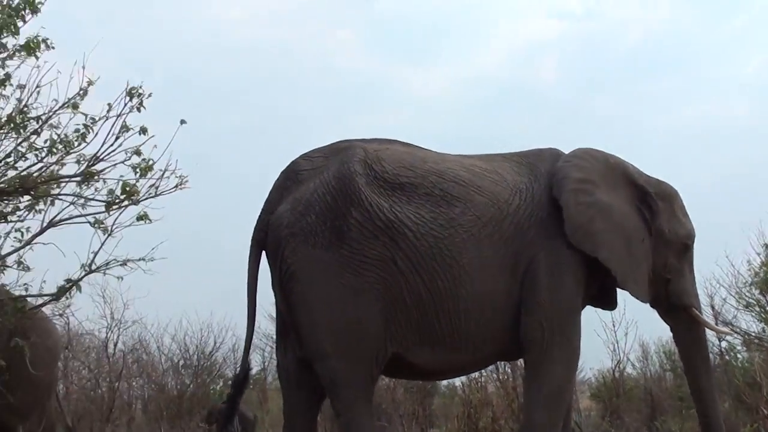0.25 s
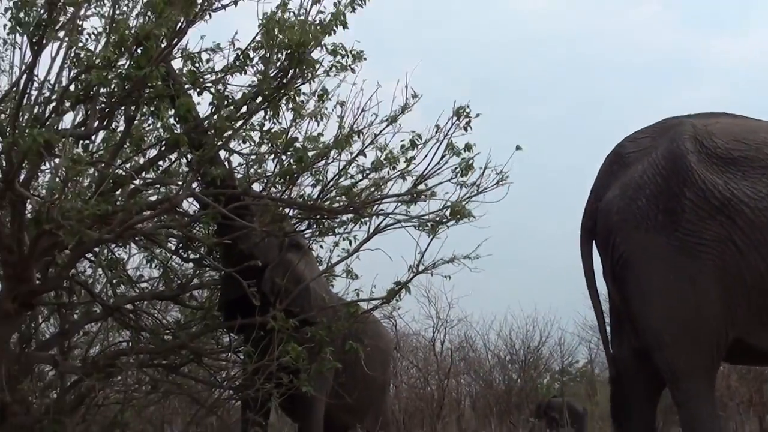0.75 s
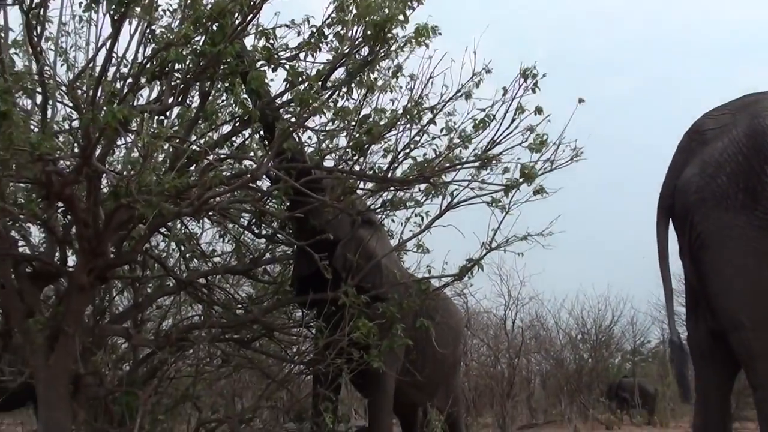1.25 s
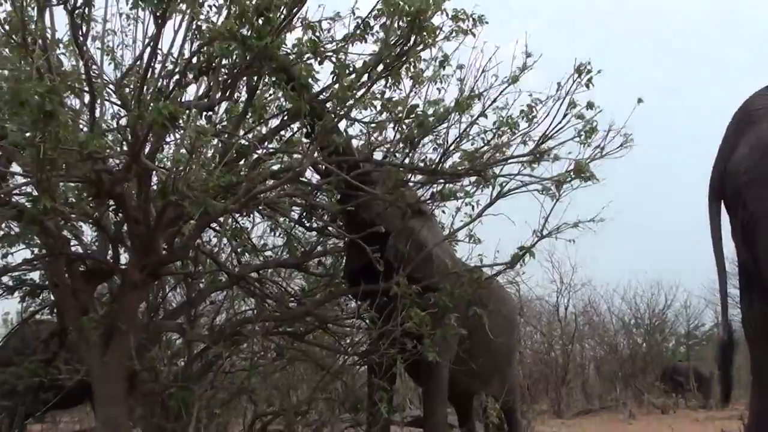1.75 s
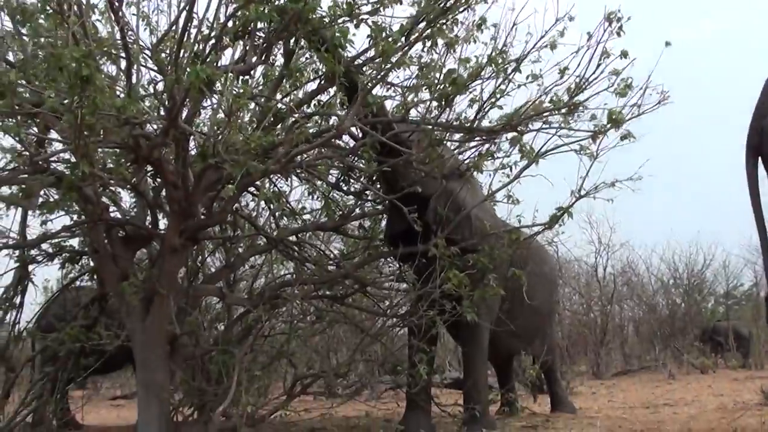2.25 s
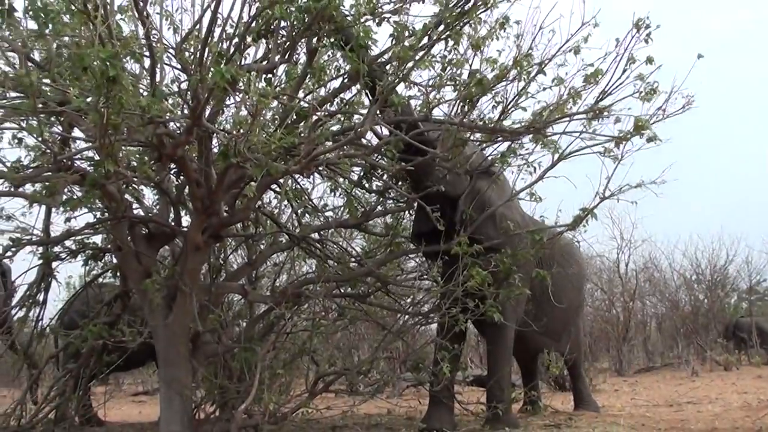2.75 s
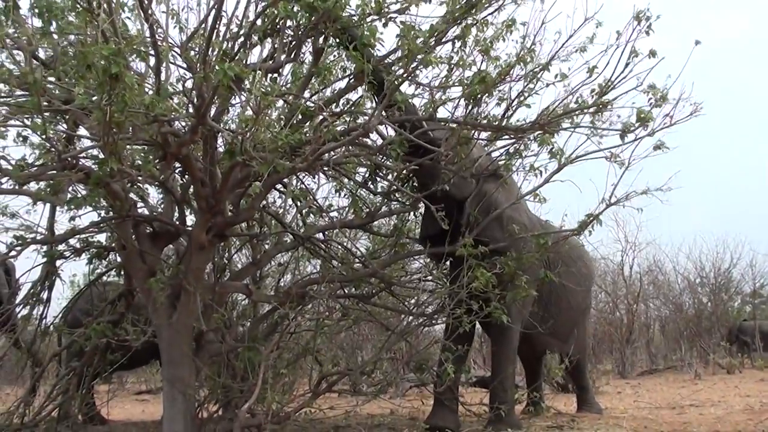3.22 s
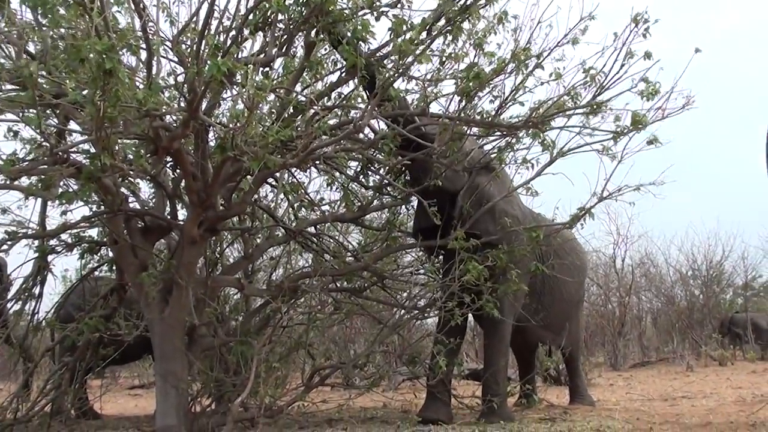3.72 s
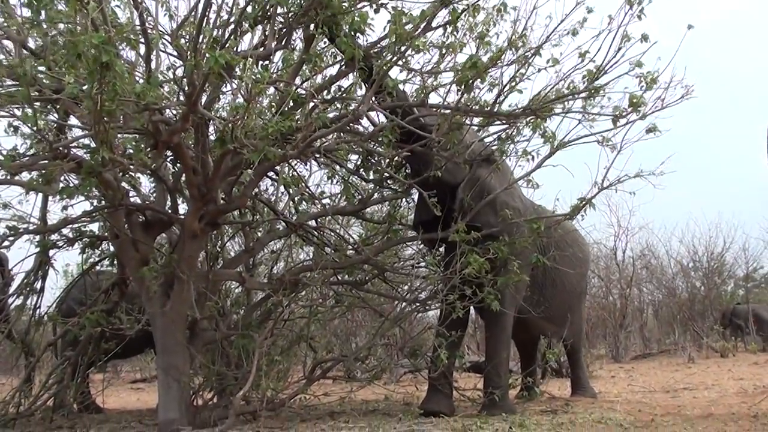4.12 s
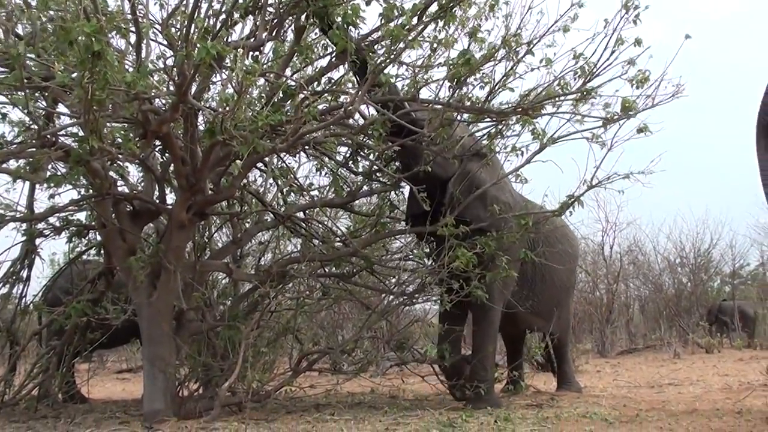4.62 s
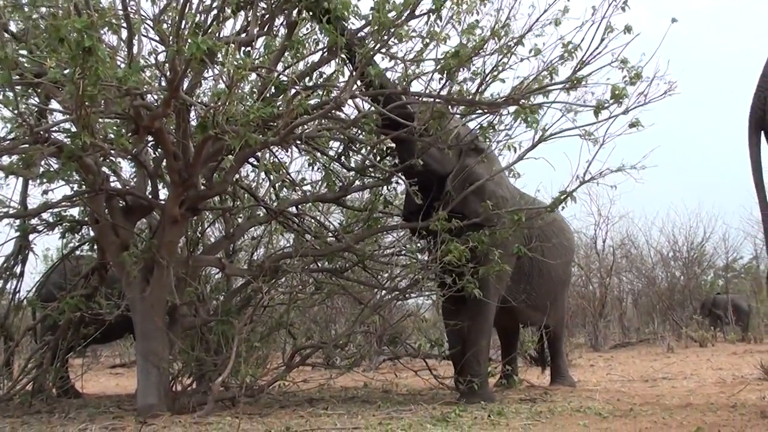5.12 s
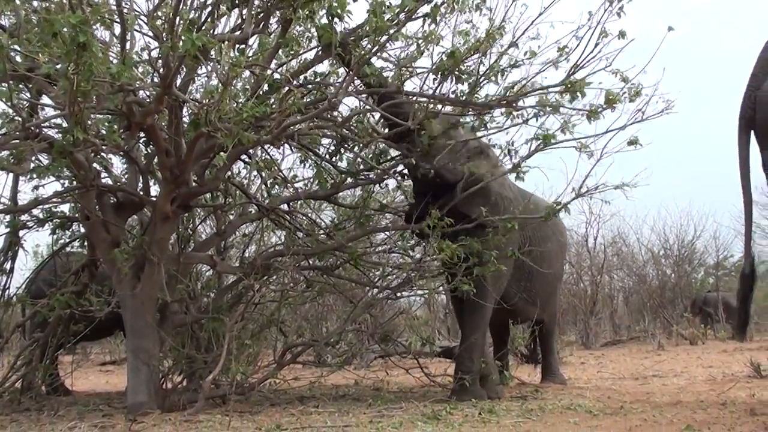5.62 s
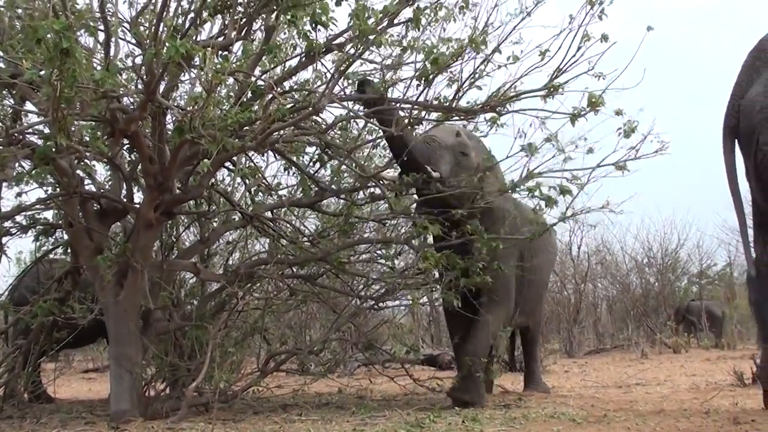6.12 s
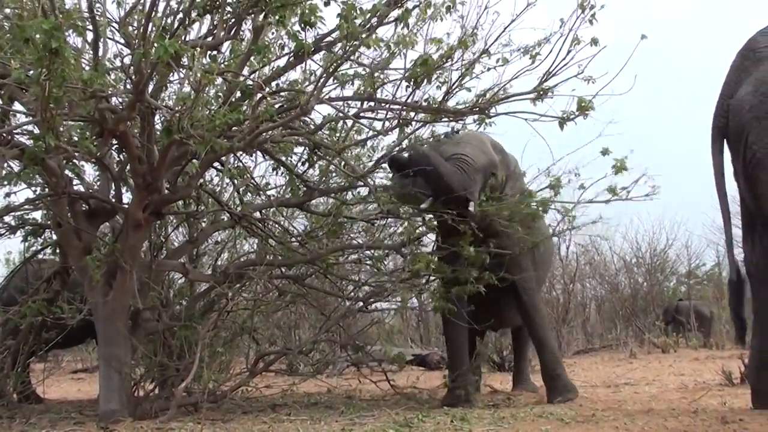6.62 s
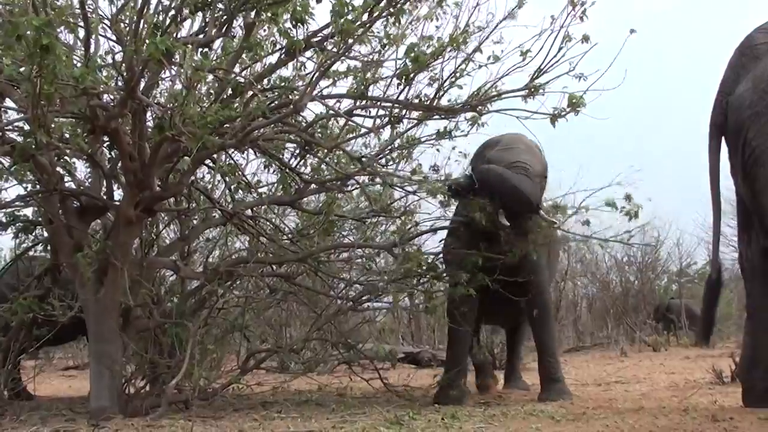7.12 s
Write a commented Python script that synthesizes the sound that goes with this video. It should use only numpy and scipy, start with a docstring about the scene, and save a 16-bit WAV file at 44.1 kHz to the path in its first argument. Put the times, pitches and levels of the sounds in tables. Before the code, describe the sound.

Sparse sharp twig cracks over a quiet outdoor bed grow into a heavy, creaking branch break with thrashing foliage as an elephant pulls it down.

```python
"""Dry bush: an elephant reaches into a tree and drags a leafy branch down with its trunk.
Twigs snap one by one as noise bursts that ring branch modes; limbs knock as damped mode pairs.
The bough gives with loud cracks and a groan of noise-driven resonances; its foliage sweeps down as clumped grains.
Echoes scatter every crack; bark swishes, leaf stalks pop, a thin high sizzle swells and fades.
The open air is otherwise quiet: a bed of coloured noise."""
import sys
import numpy as np
from scipy import signal
from scipy.fft import rfft, irfft
from scipy.io import wavfile
from scipy.ndimage import uniform_filter1d

SR = 44100
rng = np.random.default_rng(int(sys.argv[2]) if len(sys.argv) > 2 else 0)


def unload_wav(signal):
    """Save mono or channel-first audio to the path in sys.argv[1] as 16-bit WAV at rate SR, clipped to [-1, 1]."""
    wavfile.write(
        sys.argv[1],
        SR,
        np.round(np.clip(np.atleast_2d(signal).T, -1, 1) * 32767).astype(np.int16),
    )


N = 324576
TIME = np.arange(N) / SR


def from_db(db):
    """Decibels to amplitude gain."""
    return 10 ** (np.asarray(db) / 20)


def rms_one(x):
    """Scale to unit power."""
    return x / np.sqrt(np.mean(x ** 2) + 1e-20)


def unit_energy(x):
    """Scale a short sound to a mean energy of one per channel."""
    return x / np.sqrt(np.mean(np.sum(x ** 2, axis=-1)) + 1e-20)


def at_hz(points, hz):
    """Read a spectrum on a log-frequency axis."""
    f, value = np.transpose(points)
    return np.interp(np.log(np.maximum(hz, 1)), np.log(f), value)


def bins(x):
    """Frequencies of a signal's transform, in Hz."""
    return np.fft.rfftfreq(x.shape[-1], 1 / SR)


def colour(x, level_db):
    """Minimum-phase filter, by folded cepstrum, with the given level per bin."""
    size = x.shape[-1]
    cepstrum = irfft(np.log(from_db(level_db)), size)
    cepstrum[1:size // 2] *= 2
    cepstrum[size // 2 + 1:] = 0
    response = np.exp(rfft(cepstrum))
    return irfft(rfft(x) * response, size)


def spread(pair, likeness):
    """Mix two unrelated signals, as mid and side, into a partly correlated left and right."""
    alike = np.clip(at_hz(likeness, bins(pair)), 0, 1)
    mid, side = rfft(pair) * np.sqrt([(1 + alike) / 2, (1 - alike) / 2])
    return irfft(np.array([mid + side, mid - side]), pair.shape[-1])


def shaped(pair, spectrum, likeness):
    """Stereo sound of a given spectrum, at unit power."""
    stereo = spread(pair, likeness)
    return rms_one(colour(stereo, at_hz(spectrum, bins(pair))))


def drift(rate_hz):
    """Slow random curve with unit RMS: noise through two equal poles, at 1/40 of the sample rate."""
    r = np.exp(-80 * np.pi * rate_hz / SR)
    noise = rng.standard_normal(N // 40 + 2002)
    slow = signal.lfilter([1], [1, -2 * r, r * r], noise)[2000:]  # start-up dropped
    return np.interp(np.arange(N) / 40, np.arange(len(slow)), rms_one(slow))


def resonate(x, hz, width_hz):
    """Two-pole resonance with about unit gain at its peak."""
    r = np.exp(-np.pi * width_hz / SR)
    zeros = np.array([1, 0, -1]) * (1 - r * r) / 2
    poles = [1, -2 * r * np.cos(2 * np.pi * hz / SR), r * r]
    return signal.lfilter(zeros, poles, x)


def add(out, start_s, sound, level_db):
    """Mix in a short sound with the energy of 10 ms at the given level."""
    at = int(start_s * SR)
    scaled = unit_energy(sound) * np.sqrt(SR / 100) * from_db(level_db)
    part = scaled[:, :N - at]
    out[:, at:at + part.shape[1]] += part


def swell(peak_s, length_s, rise_share):
    """Bell-shaped rise to one at the peak, then a fall; the rise takes a share of the length."""
    rise = np.clip(rise_share, .1, .9)
    away = (TIME - peak_s) / (length_s * np.where(TIME < peak_s, rise, 1 - rise))
    return np.exp(-np.minimum(away ** 2, 20))


def held(start_s, end_s, attack_s, release_s):
    """Linear attack, hold and release, between zero and one."""
    attack = (TIME - start_s) / attack_s
    release = 1 - (TIME - end_s) / release_s
    return np.clip(np.minimum(attack, release), 0, 1)


# left-right likeness of the tree straight ahead: [f/Hz, correlation]
TREE_LIKENESS = [(50, 0.99), (250, 1), (500, 0.93), (1200, 0.98), (2800, 1), (6000, .91), (9000, .95),
                 (12000, .999)]


def scatter(t, near_s, far_s, far_db):
    """Noise echoes: those off nearby wood die fast, those from the farther bush are faint and linger."""
    uneven = from_db(5.7 * rng.standard_normal(len(t)))
    echoes = spread(rng.standard_normal((2, len(t))) * uneven, TREE_LIKENESS)
    fade = np.exp(-t / near_s) + from_db(far_db) * np.exp(-t / far_s)
    onset = 1 - np.exp(-(t / 0.0016) ** 2)
    return unit_energy(echoes * fade * onset)


def ringing(modes):
    """Noise, as irregular friction, keeps a set of resonances sounding; unit power."""
    friction = spread(rng.standard_normal((2, N)), TREE_LIKENESS)
    total = 0
    for hz, width_hz, db in modes:
        mode = resonate(resonate(friction, hz, width_hz), hz, 4 * width_hz)
        total = total + from_db(db) * rms_one(mode)
    return rms_one(total)


def rustle(spectrum, per_s, size_db, clump_db, smooth_db):
    """Countless small contacts come in clumps; the far ones merge into a fluttering hiss."""
    rate = per_s * from_db(clump_db * drift(14))
    born = rng.random((2, N)) < rate / SR
    sizes = from_db(size_db * np.minimum(rng.exponential(1, (2, N)), 4.5))
    signs = rng.choice([-1, 1], (2, N))
    hiss = rng.standard_normal((2, N)) * from_db(2.13 * drift(55))
    grains = rms_one(born * sizes * signs)
    return shaped(grains + from_db(smooth_db) * hiss, spectrum, TREE_LIKENESS)


# steady pull on the branch, as the stir of its foliage: [t/s, level/dB]
PULL = [(0.0, -58.5), (0.76, -57.5), (1.09, -57), (2.58, -55.5), (3.34, -52.5), (3.61, -54), (5.02, -51.5),
        (5.51, -41.5), (5.62, -44.5), (6.79, -40), (6.91, -36.5), (7.36, -41.5)]
MIDDLING_PULL_DB = -49


def pull_swing():
    """The pull's rise and fall about its middling level, in dB, interpolated in time."""
    t, level_db = np.transpose(PULL)
    return np.interp(TIME, t, level_db) - MIDDLING_PULL_DB


# level at the middling pull, and dB per dB of the pull's swing
LEAF_DB, LEAF_FOLLOWS = -50.5, 1.02
TWIG_DB, TWIG_FOLLOWS = -53.5, 0.94
LIMB_DB, LIMB_FOLLOWS = -61.5, 0.57
# single tugs of the trunk: [peak t/s, length/s, leaf level/dB, twig level/dB, limb level/dB]
TUGS = [(0.01, 0.1, -53.5, -62, -72), (0.39, 0.24, -57, -56.5, -59.5), (1.92, 0.24, -48.5, -51, -58.5),
        (2.304, 0.061, -64, -58, -58), (2.597, 0.15, -51, -49.5, -51), (2.79, 0.29, -60.5, -57, -61),
        (3.05, 0.24, -55, -56, -82), (3.417, 0.27, -51.5, -57, -67), (4.152, 0.15, -51, -49.5, -71),
        (4.5, 0.06, -50.5, -61, -62), (4.74, 0.28, -60, -55.5, -54), (5.076, 0.18, -51, -49.5, -56),
        (5.37, 0.15, -42.5, -49, -52.5), (5.605, 0.15, -45.5, -45, -50), (5.846, 0.17, -44, -40, -58),
        (6.04, 0.39, -48, -47, -54), (6.695, 0.21, -52, -44, -49.5), (7.187, 0.15, -50.5, -60, -52)]
TUG_RISE_SHARE = 0.394  # of a tug's length; the rest is its release


def shaking(pull_db):
    """Leaf, twig and limb levels in dB: the power of the steady pull plus each tug's swell."""
    leaf_db = LEAF_DB + LEAF_FOLLOWS * pull_db
    twig_db = TWIG_DB + TWIG_FOLLOWS * pull_db
    limb_db = LIMB_DB + LIMB_FOLLOWS * pull_db
    power = from_db([leaf_db, twig_db, limb_db]) ** 2
    for peak_s, length_s, *parts_db in TUGS:
        tug = swell(peak_s, length_s, TUG_RISE_SHARE)
        power = power + np.outer(from_db(parts_db), tug) ** 2
    return 10 * np.log10(power)


# louder twigs: [t/s, level/dB over 10 ms, woody body/dB, top/dB, scattered share/dB, ring f/Hz]
# body and top are relative to the crack near 8 kHz
SNAPS = [(0.1395, -37, -15, -12, 2.5, 4550), (0.296, -53.5, 21, -19, -5, 1230),
         (0.3901, -48.5, 7, -12, -12, 4400), (0.425, -50, 20, -5, -1, 910), (0.458, -46.5, 17, 2, 9, 4660),
         (0.598, -51.5, 20, -13, -8, 780), (1.0283, -42, -3, -21, -3, 2560),
         (1.2641, -45, 15, -17, -16, 2100), (1.3171, -32.5, -4.5, -3, 5, 3160),
         (1.3839, -40, -24, -5, 2, 5800), (1.7016, -46, 16, -16, -3, 920),
         (1.729, -37.5, -5.5, -8, 4, 1970), (1.8035, -34, -9, 6, -2, 5440),
         (1.8568, -41.5, 5, -27, -4, 910), (2.0, -43.5, -1, -29, 1, 1965), (2.2449, -30, -8, 0, 5, 3000),
         (2.3165, -50, 8, -8, 2, 1400), (2.264, -36, 1, 2, -2.5, 3000), (2.5327, -43.5, -7, -2, 1, 3270),
         (2.5605, -41.5, 9.5, -15, 12, 4400), (2.5831, -32, 4.5, -20, -3, 6560),
         (2.9166, -25, -5.5, -2.5, 5, 3160), (2.9643, -42.5, -6, -6, -2, 4740),
         (3.014, -46, 2, -9, -1, 4270), (3.1312, -34, -18, -9, 10, 4500), (3.2805, -41, -19, 1.5, 6, 3220),
         (3.3527, -44, -6.5, 0, 8, 6320), (3.4185, -38, -26, -7, 10, 3630), (3.438, -38, -22, 1, 6, 2450),
         (3.666, -39.5, -10, -15, 4, 4370), (3.8298, -32, -3, -3.5, -1, 1240),
         (3.9497, -36, -2.5, -7, 8, 1310), (3.996, -38, -8, -8, -1, 6580),
         (4.042, -42.5, -6, -21, 14.5, 2970), (4.1938, -44, -2, -14, -4, 2650),
         (4.3062, -45, -15, -6, 3, 4060), (4.4774, -47, 15, -5, -11, 1670),
         (4.5438, -34.5, -14, -4, 0, 3700), (4.67, -32, -18, -9, -5, 4470),
         (4.8847, -46.5, 3.5, -14, 1, 3050), (5.1318, -40, 15, -14, -12, 4950),
         (5.209, -37, 14, 5, -2, 990), (5.3122, -37.5, -12, 1, 2, 3100), (5.336, -24.5, -16, -7, 0, 4150),
         (5.358, -29, 0, -3.5, -2, 5160), (5.392, -16.5, -9, -10, -0.5, 2760),
         (5.4729, -24, -8.5, -16, -5, 2990), (5.5457, -37, -7, -10, 6, 2970), (5.638, -33, 5, 0, 11, 4420),
         (5.6493, -26, -2, -4, 2, 4460), (5.841, -33.5, 14, -16, 9, 6800),
         (5.8582, -16.5, -10, -1.5, 3.5, 6970), (5.914, -36.5, 15, -10, 0, 1890),
         (5.963, -36, -14, -8, -5, 2930), (5.9832, -36, 8, -13, -11, 1264),
         (6.034, -31.5, 18, -16, -4, 1950), (6.0533, -29, 5.5, -23, 7, 1860),
         (6.1665, -30.5, -13, -13, 10, 3820), (6.1915, -28.5, -11.5, -6, 10, 6900),
         (6.211, -28, -15, -4, 4, 6900), (6.2685, -34.5, 5.5, -14, -2.5, 5470),
         (6.396, -34.5, -31, -20, 7, 4370), (6.4718, -38.5, -20.5, -7, -12, 3100),
         (6.555, -35.5, 11, -10, 7.5, 2050), (6.728, -29.5, -6, -13, 8, 1100),
         (6.7924, -25, -1.5, -14, 8, 5420), (6.9456, -27.5, -29, -6, -5, 4180),
         (7.0166, -25, -21, -4, 4, 6900), (7.1323, -32, -10, -3, -3, 5500)]
# colour shared by all snaps: [f/Hz, level/dB]
CRACK = [(150, -13), (450, -6.5), (900, -2), (4500, 0), (5800, -1.5), (7000, 1), (8600, 5.5), (10300, 1.5),
         (12500, 1.5), (16000, -9)]
# branch modes, rung by every snap and by the creak: [f/Hz, width/Hz, level/dB]
BRANCH = [(763, 59, -4), (1131, 74, -2), (1668, 76, -9), (1973, 180, 3), (2454, 120, 3), (2650, 75, -4),
          (3012, 110, 4), (4290, 190, -2.5), (5500, 500, -2.5), (6060, 26, -11), (6630, 54, -10),
          (7670, 250, 1), (8420, 120, -2), (9660, 22, -18)]
MIDDLE_DB, MIDDLE_FOLLOWS = -0.15, 0.6  # 3.4 kHz level, and its dB per dB of body


def snaps(rows, ring_db, twig_ring_db, twig_q, first_fibre_db):
    """One fibre gives, others follow within milliseconds; twig and branch ring, thick twigs with more body."""
    out, t = np.zeros((2, N)), TIME[:2 ** 13]
    for start_s, level_db, body_db, top_db, scatter_db, twig_hz in rows:
        fibres = rng.standard_normal((2, len(t)))
        tear = np.exp(-t / 0.00088) + 0.25 * np.exp(-t / 0.0031)
        # the second noise differs in sign between left and right
        direct = unit_energy((fibres[0] + 0.046 * fibres[1] * [[1], [-1]]) * tear)
        direct[:, 0] += from_db(first_fibre_db)
        echoes = scatter(t, near_s=0.01, far_s=0.031, far_db=-15.0)
        crack = unit_energy(direct) + from_db(scatter_db) * echoes
        own = from_db(twig_ring_db) * resonate(crack, twig_hz, twig_hz / twig_q)
        carried = 0
        for hz, width_hz, db in BRANCH:
            mode_gain = from_db(db + ring_db + rng.normal(0, 1.3))
            carried = carried + mode_gain * resonate(crack, hz, width_hz)
        middle_db = MIDDLE_DB + MIDDLE_FOLLOWS * body_db
        twig = [(1100, body_db), (3400, middle_db), (6500, 0), (9500, 0), (12500, top_db)]
        spectrum_db = at_hz(twig, bins(t)) + at_hz(CRACK, bins(t))
        add(out, start_s, colour(crack + own + carried, spectrum_db), level_db)
    return out


# lesser twigs: mean rate, level re leaves at the middling pull, dB per dB of the leaves' swing
SMALL_PER_S, SMALL_DB, SMALL_FOLLOWS = 9, 0.5, 0.53
# their body and ring at middling thickness; top and scattered share
SMALL_BODY_DB, SMALL_RING_HZ, SMALL_TOP_DB, SMALL_SCATTER_DB = -10, 3800, -9, 1.5


def small_snaps(leaf_db):
    """Snap rows for lesser twigs, which break at random and harder as the foliage moves more."""
    starts = np.flatnonzero(rng.random(N) < SMALL_PER_S / SR)
    level_db = LEAF_DB + SMALL_DB + SMALL_FOLLOWS * (leaf_db - LEAF_DB)
    rows = []
    for at, (force, thick) in zip(starts, rng.uniform(-0.97, 1, (len(starts), 2))):
        body_db = SMALL_BODY_DB + 11 * thick
        ring_hz = SMALL_RING_HZ * 2 ** (-.7 * thick)
        rows.append((at / SR, level_db[at] + 3 * force, body_db, SMALL_TOP_DB, SMALL_SCATTER_DB, ring_hz))
    return rows


# dull knocks of limbs and feet: [t/s, level/dB over 10 ms, f/Hz, t60/s]
KNOCKS = [(0.465, -43, 296, 0.018), (0.529, -45, 755, 0.03), (0.599, -49.5, 320, 0.007),
          (0.66, -53, 320, 0.016), (1.028, -37, 950, 0.015), (1.03, -48, 186, 0.014),
          (1.031, -40, 620, 0.0084), (1.263, -47.5, 1350, 0.014), (2.245, -47, 703, 0.15),
          (2.83, -52.5, 310, 0.026), (3.362, -43.5, 576, 0.035), (4.09, -54.5, 328, 0.03),
          (4.385, -51, 298, 0.027), (4.669, -49, 303, 0.026), (5.132, -45.5, 970, 0.025),
          (5.41, -37.5, 635, 0.0077), (5.434, -42, 120, 0.078), (5.982, -35, 1270, 0.022),
          (6.035, -35.5, 720, 0.011), (6.73, -49, 189, 0.04), (7.155, -49, 230, 0.036),
          (7.234, -41, 187, 0.14)]
OVERTONE_RATIO, OVERTONE_DB = 2.5, -7  # second bending mode: multiple of the pitch, level


def knocks(bounce_s, bounce_gain, scatter_db):
    """A short contact and its rebound excite two heavily damped modes of a limb."""
    out, t = np.zeros((2, N)), TIME[:2 ** 13]
    for start_s, level_db, hz, t60_s in KNOCKS:
        blow = from_db(scatter_db) * scatter(t, near_s=0.0064, far_s=0.045, far_db=-28)
        blow[:, 0] += 1
        blow[:, int(bounce_s * SR)] += bounce_gain
        width_hz = np.log(1000) / (np.pi * t60_s)
        overtone = from_db(OVERTONE_DB) * resonate(blow, OVERTONE_RATIO * hz, width_hz)
        ring = resonate(blow, hz, width_hz) + overtone
        add(out, start_s, resonate(ring, hz, hz), level_db)
    return out


# bough modes: [f/Hz, width/Hz, level/dB]
BOUGH = [(245, 15, -0.5), (313, 9.1, -2.5), (453, 81, -5.5), (757, 98, -1)]
BEND_START_S, BEND_END_S, BEND_ATTACK_S, BEND_RELEASE_S = 5.32, 5.75, 0.042, 0.11
GROAN_DB, GROAN_SWELL_DB_PER_S = -49.5, 10.5  # level at the start of the bend, and its rise


def groan(bend):
    """Friction rings the bough's modes, evened in level, ever louder while it bends."""
    tone = ringing(BOUGH)
    power = uniform_filter1d(np.mean(tone ** 2, axis=0), size=3000)
    level_db = GROAN_DB + GROAN_SWELL_DB_PER_S * (TIME - BEND_START_S)
    return from_db(level_db) * bend * tone / np.sqrt(power + 1e-6)


CREAK_DB, CREAK_FOLLOWS = -60.5, 1.16  # level at the middling pull, dB per dB of its swing
BEND_CREAK_DB = -50.5


def creak(pull_db, bend):
    """Friction rings the branch modes, fluttering, with the strain of pull and bend."""
    pulled = from_db(CREAK_DB + CREAK_FOLLOWS * pull_db)
    strain = np.hypot(pulled, from_db(BEND_CREAK_DB) * bend)
    return strain * from_db(0.87 * drift(23)) * ringing(BRANCH)


# leaf colour: [f/Hz, level/dB]
LEAVES = [(2500, -22), (4300, -6.5), (6000, -4.5), (7200, 1.5), (8300, 2.5), (9400, -3.5), (11000, -6.5),
          (13000, -12), (16000, -31)]


def leaves(leaf_db):
    """Foliage sweeps as strongly clumped, bright contacts."""
    return from_db(leaf_db) * rustle(LEAVES, per_s=1500, size_db=2.5, clump_db=8.0, smooth_db=-1.5)


def stalks(leaf_db, per_s, below_db, spread_db):
    """Leaf stalks pop at random, each at its own pitch, oftener and louder as the foliage moves more."""
    out, t = np.zeros((2, N)), TIME[:2 ** 11]
    rate = per_s * from_db((leaf_db - leaf_db.max()) / 2)
    for at in np.flatnonzero(rng.random(N) < rate / SR):
        hz = np.clip(7000 * 2 ** rng.normal(0, .45), 2000, 11000)
        pop = from_db(-3.0) * scatter(t, near_s=0.0058, far_s=0.02, far_db=-21)
        pop[:, 0] += 1
        # stalks pitched away from the rustle's main band are fainter
        level_db = leaf_db[at] + below_db + at_hz(LEAVES, hz) / 2 - spread_db * rng.random()
        add(out, at / SR, resonate(pop, hz, hz / 3), level_db)
    return out


# twig colour: [f/Hz, level/dB]
TWIGS = [(300, -15.5), (550, -5), (780, 0.5), (1000, 0.5), (1250, -0.5), (1600, -2.5), (2100, -0.5),
         (3000, -2), (4200, -1), (6500, -14)]


def twigs(twig_db):
    """Twigs brush together as clumped, mid-pitched contacts."""
    return from_db(twig_db) * rustle(TWIGS, per_s=900, size_db=4.0, clump_db=3, smooth_db=4.5)


# limb colour: [f/Hz, level/dB]
LIMBS = [(35, -22), (60, -11.5), (110, 0.5), (190, 3), (300, -3), (450, -3), (700, -6), (1400, -37.5)]


def limbs(limb_db):
    """Heavy wood shifts with a low shuffle of contacts."""
    return from_db(limb_db) * rustle(LIMBS, per_s=300, size_db=2.5, clump_db=0.5, smooth_db=0.5)


# boughs sliding over each other: [peak t/s, length/s, level/dB, centre f/Hz at the peak]
SLIDES = [(1.933, 0.17, -54, 2090), (4.163, 0.086, -54, 2055), (6.1, 0.38, -57, 1166),
          (6.789, .46, -44, 1287), (7.22, .3, -49.5, 1230)]
SLIDE_RISE_SHARE, SLIDE_RISE_HZ_PER_S, SWISH_WIDTH_HZ = 0.45, 550, 350


def swish():
    """Bark rubs on bark with a hollow swish: a noise band that glides up as the contact moves."""
    smooth = signal.butter(2, SWISH_WIDTH_HZ / 2, fs=SR, output="sos")
    out = np.zeros(N)
    for peak_s, length_s, level_db, centre_hz in SLIDES:
        noise = rng.standard_normal(N) + 1j * rng.standard_normal(N)
        friction = signal.sosfilt(smooth, noise)
        hz = centre_hz + SLIDE_RISE_HZ_PER_S * (TIME - peak_s)
        carrier = np.exp(2j * np.pi * np.cumsum(hz) / SR)
        rub = rms_one(np.real(friction * carrier))
        out += from_db(level_db) * swell(peak_s, length_s, SLIDE_RISE_SHARE) * rub
    return out


# sizzle resonances: [f/Hz, width/Hz, level/dB]
SIZZLE_MODES = [(7270, 290, -1.5), (8400, 390, 0), (9840, 280, -8)]
SIZZLE_PEAK_S, SIZZLE_LENGTH_S, SIZZLE_RISE_SHARE, SIZZLE_DB = 1.04, .95, .3, -56.5


def sizzle():
    """Narrow, high noise-driven resonances flutter as they swell and more slowly fade."""
    envelope = swell(SIZZLE_PEAK_S, SIZZLE_LENGTH_S, SIZZLE_RISE_SHARE)
    return envelope * from_db(SIZZLE_DB + 2.4 * drift(45)) * ringing(SIZZLE_MODES)


# air colour: [f/Hz, level/dB]
AIR = [(20, -21), (45, -9), (62, 1), (80, -7.5), (140, -4), (300, -5), (1000, -6.5), (3000, -12.5),
       (8000, -20.5), (16000, -21)]
# left-right likeness of air from all around: [f/Hz, correlation]
AIR_LIKENESS = [(60, 0.99), (140, 0.91), (260, .45), (500, 0.031), (1500, 0.024), (4000, 0.19),
                (8000, 0.36), (13000, 0.99)]
AIR_DB = -57


def air():
    """Quiet open air: steady coloured noise, wide in the middle range."""
    return from_db(AIR_DB) * shaped(rng.standard_normal((2, N)), AIR, AIR_LIKENESS)


LEFT_DB = -.5  # left minus right, for cracks, leaves and stalks


def scene():
    """The tree under the elephant's pull, in still air."""
    pull_db = pull_swing()
    leaf_db, twig_db, limb_db = shaking(pull_db)
    bend = held(BEND_START_S, BEND_END_S, BEND_ATTACK_S, BEND_RELEASE_S)
    rows = list(SNAPS) + small_snaps(leaf_db)
    cracks = snaps(rows, ring_db=-5, twig_ring_db=6.5, twig_q=19, first_fibre_db=-13)
    pops = stalks(leaf_db, per_s=70, below_db=1.7, spread_db=13.5)
    balance = from_db([[LEFT_DB / 2], [-LEFT_DB / 2]])
    crown = (cracks + leaves(leaf_db) + pops) * balance
    blows = knocks(bounce_s=0.00276, bounce_gain=0.15, scatter_db=-2.5)
    wood = blows + groan(bend) + creak(pull_db, bend) + twigs(twig_db) + limbs(limb_db)
    return crown + wood + swish() + sizzle() + air()


CUTOFF_HZ = 15900


def record(dry):
    """Tanh rounds the highest peaks; a steep elliptic low-pass cuts the top."""
    rounded = .9 * np.tanh(dry / .9)
    low_pass = signal.ellip(10, .2, 80, CUTOFF_HZ, fs=SR, output="sos")
    return signal.sosfilt(low_pass, rounded)


dry = scene()
out = record(dry)
unload_wav(out)
```